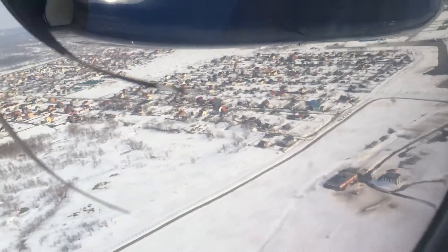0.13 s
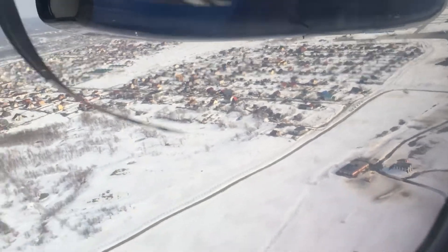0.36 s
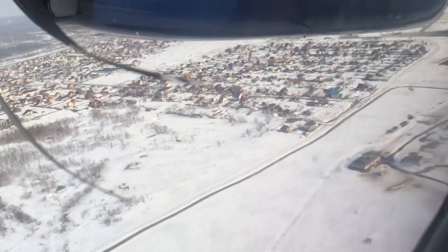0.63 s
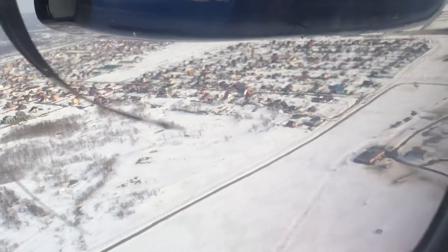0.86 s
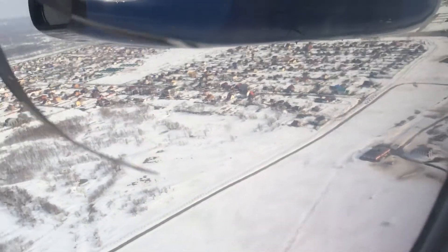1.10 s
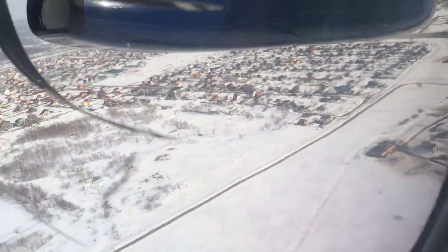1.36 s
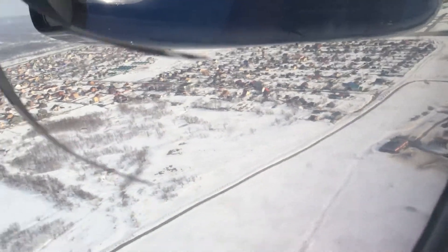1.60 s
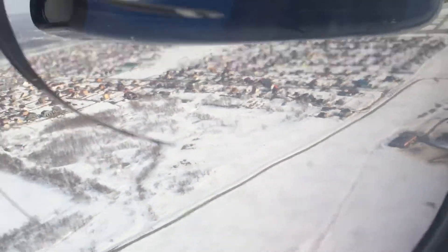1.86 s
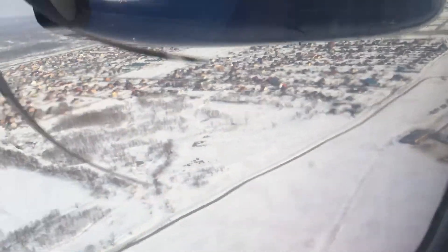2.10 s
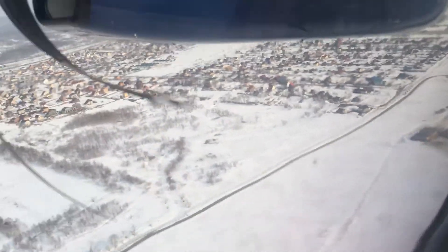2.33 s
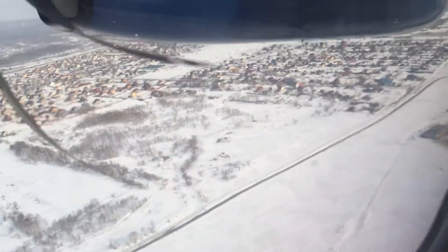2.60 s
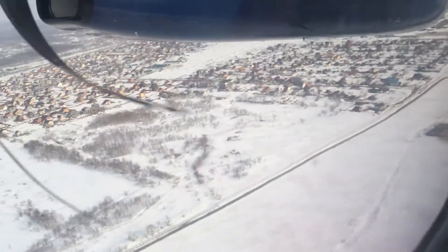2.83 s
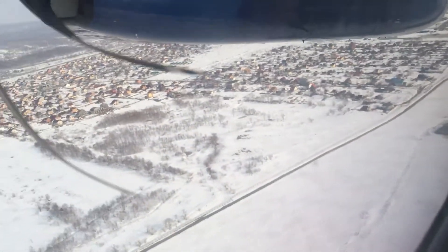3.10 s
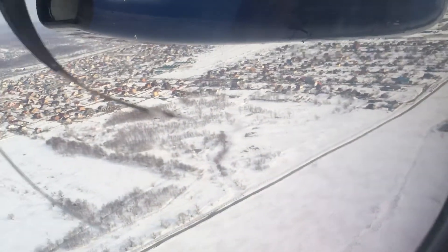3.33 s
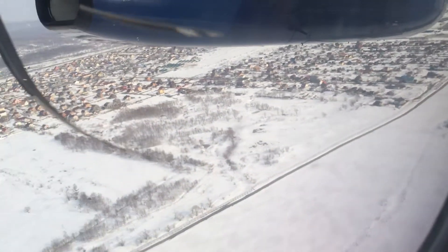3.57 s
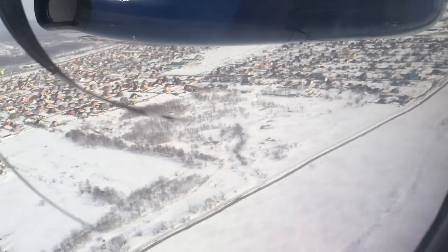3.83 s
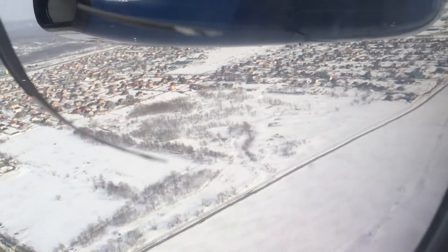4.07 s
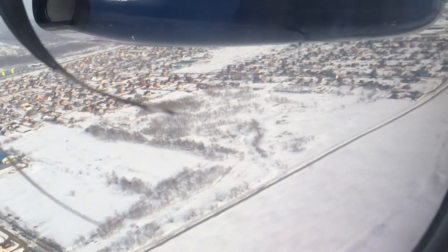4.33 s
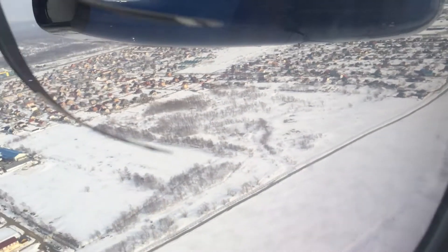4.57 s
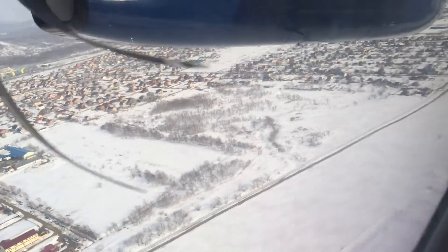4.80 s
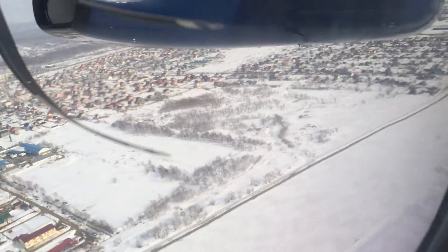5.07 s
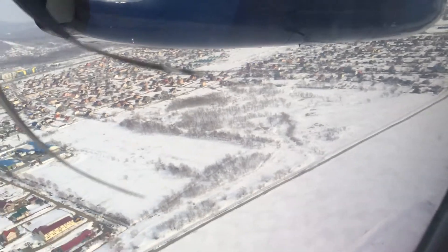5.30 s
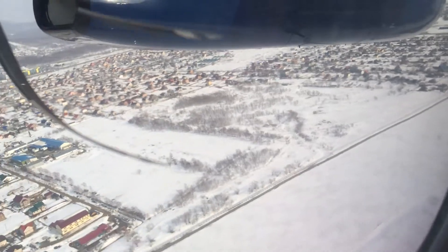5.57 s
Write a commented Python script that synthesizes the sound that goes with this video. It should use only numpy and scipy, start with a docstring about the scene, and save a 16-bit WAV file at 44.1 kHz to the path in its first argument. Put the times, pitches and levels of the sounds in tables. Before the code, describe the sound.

Inside a turboprop cabin, a deep propeller drone throbs slowly and flutters while low airflow roars and loose trim buzzes faintly.

```python
"""Two propellers drone in the cabin of a twin turboprop in flight, through a small microphone with a limiter.
They turn at nearly the same speed, so their steady tones beat slowly; the airframe shakes at about 24 Hz.
Shaped noise makes the airflow roar, thin wandering tones the turbine whine.
Loose trim buzzes and ticks: clicks and bursts of noise at each blade pass make it ring."""
import sys
import numpy as np
from scipy import signal
from scipy.fft import rfft, irfft, next_fast_len
from scipy.io import wavfile
from scipy.ndimage import uniform_filter1d, minimum_filter1d

SR = 44100
rng = np.random.default_rng(int(sys.argv[2]) if len(sys.argv) > 2 else 0)


def voltage_ratio(level):
    """Linear amplitude factor for a level in decibels (scalar or array-like)."""
    return 10 ** (np.asarray(level, float) / 20)


def output_pcm(signal):
    """Save a mono or channel-first signal as 16-bit PCM at the path in sys.argv[1].

    Samples are clipped to [-1, 1] before scaling.
    """
    pcm = np.clip(np.atleast_2d(signal).T, -1, 1) * 32767
    wavfile.write(sys.argv[1], SR, np.round(pcm).astype(np.int16))


N = 250487

# airflow roar, only its shape counts: (frequency [Hz], density [dB per Hz])
ROAR_SHAPE = [(20, -19), (40, -2), (100, 3), (180, -0.5), (260, -11.5), (400, -22.5), (600, -27.5),
              (850, -27), (1000, -32), (2000, -39), (3500, -42), (4700, -48), (6600, -44), (8500, -53.5),
              (11500, -62), (13300, -54), (15500, -55.5)]
# turbine speed: (time [s], change [parts per thousand])
TURBINE_SPEED = [(0, -.1), (.5, 0.37), (1.6, .0), (2.8, -.3), (3.5, .3), (4.6, -0.38), (5.68, -0.62)]
# gearbox and turbine tones before the speed wanders: frequency [Hz]
WHINE_HZ = [779.5, 2083, 6620, 7339, 7660, 8615, 13320, 14600]
# the same tones in turn: (peak level [dB], phase swing by the drone [rad])
WHINE_LEVELS = [(-53, .1), (-65, 0.16), (-58, 0.45), (-72.5, 1.7), (-71, 2.6), (-76.5, 1.2), (-68.5, 1.5),
                (-81.5, 0.2)]
# what the knocked parts ring with, levels relative: (frequency [Hz], width [Hz], level [dB])
SLAP_MODES = [(464, 110, 5.5), (680, 330, 0), (1220, 400, -12)]
PANEL_MODES = [(805.5, 26, 4), (890, 43, -12)]
LOW_BUZZ_MODES = [(2500, 70, 1.5), (2730, 60, -5), (3700, 120, -10)]
HIGH_BUZZ_MODES = [(4020, 45, 0), (4075, 70, -1), (4165, 70, -3), (4280, 90, -16), (8200, 200, -14)]
# each loose part wakes near one offset between the propellers: (resting level [dB], woken level [dB],
# offset near minus far [blade turns], half width [blade turns], abruptness [no unit])
SLAP_WAKING = (-58, -32.5, .055, .088, 20)
PANEL_WAKING = (-52, -43, .95, .16, 8)
LOW_BUZZ_WAKING = (-70, -56.5, .48, .14, 10)
HIGH_BUZZ_WAKING = (-65, -57.5, .54, .3, 4)
RATTLE_WAKING = (-64, -51.5, .9, .17, 7)
TICKS_WAKING = (-80, -61, .79, .12, 25)
# for a while the loose parts are hit strong-weak: (start [s], end [s], swing [dB])
LIMP = (4.7, 5.5, 4.2)
# upper orders, read by both propellers: (frequency [Hz], peak level [dB])
UPPER_ORDERS = [(480, -54.5), (640, -53), (840, -56), (960, -58.5), (1040, -62), (1160, -53), (1300, -62),
                (1500, -64), (1650, -69), (1900, -65), (2900, -74.5)]
# the drone's crest slides against the near blades: (offset [blade turns], shift [blade turns])
CREST_SHIFT = [(0, 0), (.3, -.16), (.67, -.27), (.93, .04), (1, 0)]
# tones mixed by the flexing wall: (near order [count], far order [count], level [dB], lag [turns])
SUM_TONES = [(1, 1, -39, -.41), (2, 1, -37, .01), (1, 2, -40.5, -.38), (2, 2, -44, -.17), (3, 1, -50, .36),
             (1, 3, -59, .32), (4, 1, -53, .03), (3, 2, -51, .4), (1, 4, -47.5, .4), (2, 3, -46.5, .42)]
# low orders as the cabin passes them on: (order [count], near level [dB], near lag [turns],
# far level [dB], far lag [turns], shake depth [share, negative = in opposition])
LOW_ORDERS = [(1, -8, 0.093, -24, 0.25, 0.41), (2, -7.9, 0.1445, -7.5, 0.3524, -0.11),
              (3, -38, -0.52, -18.5, -0.43, .03), (4, -43, -.19, -40.5, -.12, -0.054),
              (5, -48.5, .42, -43, -0.021, 0.074)]
# speeds: (time [s], near blade rate [Hz], far blade rate [Hz], airframe shake [Hz])
SPEEDS = [(0.0, 80.302, 80.062, 23.601), (0.947, 80.254, 79.841, 23.743), (1.893, 80.206, 79.855, 23.264),
          (2.84, 80.09, 79.855, 24.323), (3.787, 80.134, 79.949, 24.099), (4.733, 80.486, 80.062, 22.665),
          (5.68, 79.846, 79.647, 24.698)]


def unit(x):
    """Scale to an rms of 1."""
    return x / np.sqrt(np.mean(x ** 2) + 1e-20)


def in_time(rows):
    """Read each column of a time table at every sample."""
    s, *columns = np.transpose(rows)
    return [np.interp(np.arange(N) / SR, s, c) for c in columns]


def at_hz(points, hz):
    """Read a spectrum table, evenly in pitch between its points."""
    table_hz, db = np.transpose(points)
    return np.interp(np.log(hz), np.log(table_hz), db)


def drift(rate_hz):
    """A slow random wander with a spread of 1, made from smoothed noise."""
    hop = 40  # samples between points of the wander
    r = np.exp(-2 * np.pi * rate_hz * hop / SR)
    noise = rng.standard_normal(N // hop + 2002)
    slow = signal.lfilter([1], [1, -2 * r, r * r], noise)[2000:]  # skip the filter's start
    return np.interp(np.arange(N) / hop, np.arange(len(slow)), unit(slow - slow.mean()))


def resonate(x, hz, width_hz):
    """A part that prefers one pitch: two-pole resonance with a gain of 1 on top."""
    r = np.exp(-np.pi * width_hz / SR)
    poles = [1, -2 * r * np.cos(2 * np.pi * hz / SR), r * r]
    return signal.lfilter([(1 - r * r) / 2, 0, (r * r - 1) / 2], poles, x)


def band_pass(x, order, low_hz, high_hz):
    """Keep only the sound between two frequencies."""
    return signal.sosfilt(signal.butter(order, [low_hz, high_hz], "band", fs=SR, output="sos"), x)


def roar(push):
    """Airflow noise shaped by the cabin wall, which lets more through when the drone drives it hard."""
    size = next_fast_len(N)
    hz = np.maximum(np.fft.rfftfreq(size, 1 / SR), 10)
    shaped = rfft(rng.standard_normal(size)) * voltage_ratio(at_hz(ROAR_SHAPE, hz))
    strain = uniform_filter1d(push ** 2, SR // 8) ** 0.091
    return strain * voltage_ratio(-23.5) * unit(irfft(shaped, size)[:N])


def turbine(push):
    """Thin tones wander with the turbine speed; the moving diaphragm bends their phase into side lines."""
    change = in_time(TURBINE_SPEED)[0] + 0.15 * drift(4.0)  # parts per thousand
    run_s = np.cumsum(1 + change / 1000) / SR
    out = 0
    for hz, (db, swing) in zip(WHINE_HZ, WHINE_LEVELS):
        out = out + voltage_ratio(db) * np.sin(2 * np.pi * hz * run_s + swing * push)
    return out


def ring(x, modes):
    """A struck part sounds all its resonances, in alternating sign, scaled to an rms of 1."""
    out = 0
    for k, (hz, width_hz, db) in enumerate(modes):
        out = out + voltage_ratio(db) * (-1) ** k * unit(resonate(x, hz, width_hz))
    return unit(out)


def knocks(turns, shake, shake_db, spread_db):
    """One click at each blade pass, harder on the crest of the shake, with random strength."""
    passes = np.diff(np.floor(turns), append=np.floor(turns[-1])) > 0
    strength = voltage_ratio(shake_db * shake + spread_db * rng.standard_normal(N))
    return unit(passes * strength) + 1e-18


def woken(slip, rest_db, woken_db, at_turns, half_turns, abrupt):
    """Gain of a loose part, which rises while the propeller offset is close to its own."""
    close = np.cos(2 * np.pi * (slip - at_turns)) - np.cos(2 * np.pi * half_turns)
    return voltage_ratio(rest_db + (woken_db - rest_db) / (1 + np.exp(-abrupt * close)))


def panel(crest, slip, late_shake, chatter):
    """Each blade pass slaps a panel, giving a dull slap and a longer ring."""
    blows = knocks(crest + 0.415, late_shake, shake_db=2.0, spread_db=1.5)
    slap = ring(resonate(resonate(blows, 800, 400), 620, 500), SLAP_MODES)
    ringing = ring(0.8 * chatter - blows, PANEL_MODES)
    return woken(slip, *SLAP_WAKING) * slap + woken(slip, *PANEL_WAKING) * ringing


def buzz(slip, taps, raps, low_chatter, high_chatter):
    """Small loose parts ring from knocks and noise bursts, heard as a low and a high buzz."""
    low = ring(taps + 0.4 * low_chatter, LOW_BUZZ_MODES)
    high = ring(high_chatter + 0.9 * raps, HIGH_BUZZ_MODES)
    return woken(slip, *LOW_BUZZ_WAKING) * low + woken(slip, *HIGH_BUZZ_WAKING) * high


def rattle(slip, raps, chatter):
    """Noise bursts and knocks in a broad middle band."""
    return woken(slip, *RATTLE_WAKING) * unit(band_pass(chatter + 0.31 * raps, 1, 1200, 4500))


def ticks(crest, slip, shake, chatter):
    """Dry treble ticks: clicks and noise bursts in a high band."""
    clicks = knocks(crest + 0.2, shake, shake_db=0.1, spread_db=3.5) + 1.1 * chatter
    return woken(slip, *TICKS_WAKING) * unit(band_pass(clicks, 2, 7000, 12500))


def trim(crest, slip, shake, late_shake):
    """All loose parts, driven by knocks and by noise that swells once for each blade pass."""
    burst = np.exp(1.2 * np.cos(2 * np.pi * (crest + 0.55)) + 0.11 * shake)
    chatter = unit(burst) * rng.standard_normal((3, N))
    start_s, end_s, swing_db = LIMP
    seconds = np.arange(N) / SR
    limping = (seconds > start_s) & (seconds < end_s)
    strong_weak = np.cos(np.pi * np.floor(crest))  # +1 and -1 on alternate blades
    limp = voltage_ratio(swing_db * limping * strong_weak)
    taps = limp * knocks(crest + 0.67, late_shake, shake_db=1.0, spread_db=3.5)
    raps = limp * knocks(crest + 0.77, late_shake, shake_db=1.0, spread_db=2.5)
    out = panel(crest, slip, late_shake, chatter[0])
    out = out + buzz(slip, taps, raps, chatter[0], chatter[1])
    return out + rattle(slip, raps, chatter[2]) + ticks(crest, slip, shake, chatter[2])


def upper_orders(crest, far):
    """Higher orders from the drone's crest and the far blades, each with its own lag and waver."""
    out = 0
    crest_turn, far_turn = np.exp(2j * np.pi * crest), np.exp(2j * np.pi * far)
    first = len(LOW_ORDERS) + 1
    # one more multiplication by a turn gives the next order
    crest_order, far_order = crest_turn ** (first - 1), far_turn ** (first - 1)
    for order in range(first, 37):
        crest_order, far_order = crest_order * crest_turn, far_order * far_turn
        lags = np.exp(2j * np.pi * rng.random(2))
        pair = (lags[0] * crest_order + 0.32 * lags[1] * far_order).real
        level = voltage_ratio(at_hz(UPPER_ORDERS, order * SPEEDS[0][1]))
        out = out + level * (1 + 0.13 * drift(0.6)) * pair
    return out


def sum_tones(near, far):
    """The flexing wall mixes orders of both propellers into tones at the sum of their rates."""
    out = 0
    for near_order, far_order, db, lag in SUM_TONES:
        out = out + voltage_ratio(db) * np.cos(2 * np.pi * (near_order * near + far_order * far + lag))
    return out


def drone(near, far, shake):
    """The first blade orders of both propellers; the shake swells and shrinks them."""
    out = 0
    for order, near_db, near_lag, far_db, far_lag, depth in LOW_ORDERS:
        pair = voltage_ratio(near_db) * np.cos(2 * np.pi * (order * near + near_lag))
        pair = pair + voltage_ratio(far_db) * np.cos(2 * np.pi * (order * far + far_lag))
        out = out + pair * (1 + depth * shake)
    return out


def scene():
    """Mix all sources; drone and shake pump the sensitivity for roar, turbine and upper orders."""
    near, far, shake_turns = [np.cumsum(hz) / SR for hz in in_time(SPEEDS)]
    shake = np.cos(2 * np.pi * (shake_turns + 0.24))
    late_shake = np.cos(2 * np.pi * (shake_turns + 0.24 - 0.53))  # the knocked parts lag 0.53 turns
    low = drone(near, far, shake)
    push = unit(low)
    slip = near - far
    crest = near + np.interp(slip % 1, *np.transpose(CREST_SHIFT))
    pumped = np.exp(0.13 * push + 0.17 * shake)
    weak = roar(push) + turbine(push) + upper_orders(crest, far)
    mix = low + sum_tones(near, far) + weak * pumped + trim(crest, slip, shake, late_shake)
    return mix[None]


def roll_off(x):
    """The treble ends steeply here."""
    return signal.sosfilt(signal.butter(12, 15600, fs=SR, output="sos"), x)


def record(dry):
    """A limiter ducks just ahead of each peak and recovers at a steady rate; both ends are faded."""
    drive_db, ceiling, release_db_per_s, lookahead_s, fade_s = -0.5, 0.707, 47.5, 0.0056, 0.002
    x = voltage_ratio(drive_db) * dry
    over_db = np.maximum(20 * np.log10(np.abs(x[0]) / ceiling + 1e-9), 0)
    ramp = release_db_per_s * np.arange(N) / SR
    ahead = max(int(lookahead_s * SR), 1)
    held = np.maximum.accumulate(over_db + ramp) - ramp
    held = -minimum_filter1d(-held, 2 * ahead + 1)  # largest value nearby, before and after
    duck_db = uniform_filter1d(uniform_filter1d(held, ahead), ahead)
    from_end = np.minimum(np.arange(N), np.arange(N)[::-1])
    fade = np.minimum(from_end / (fade_s * SR), 1) ** 2
    return roll_off(x * voltage_ratio(-duck_db) * fade)


dry = scene()
out = record(dry)
output_pcm(out)
```